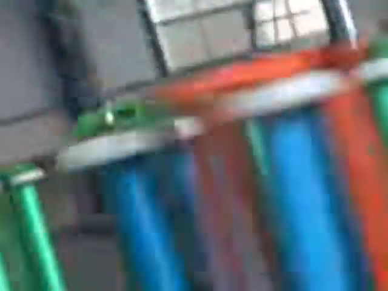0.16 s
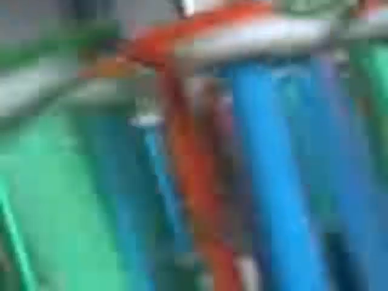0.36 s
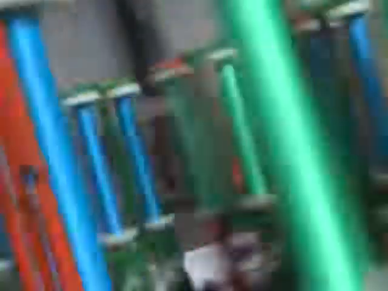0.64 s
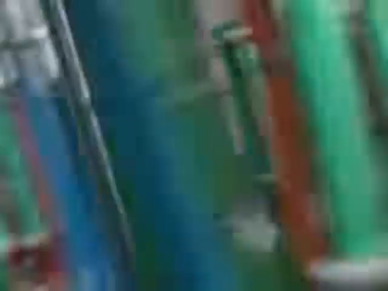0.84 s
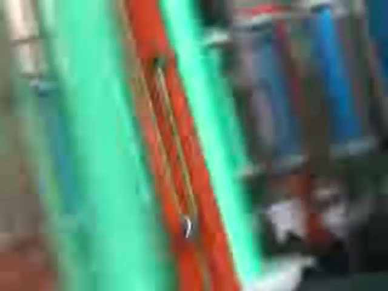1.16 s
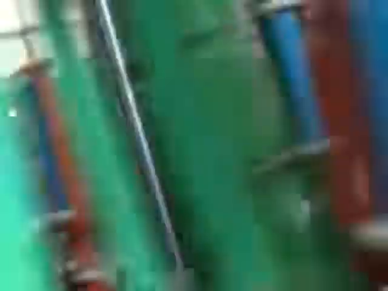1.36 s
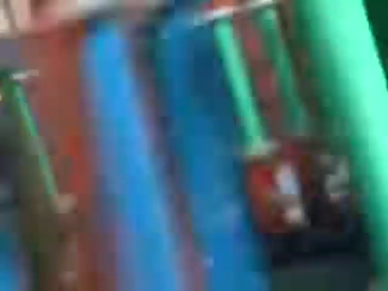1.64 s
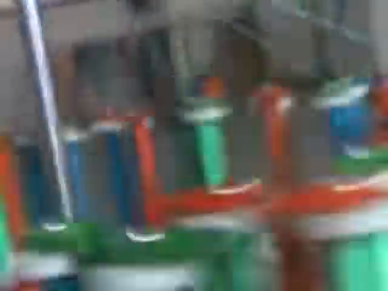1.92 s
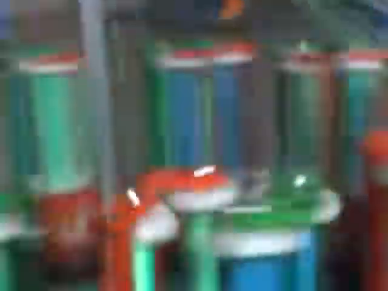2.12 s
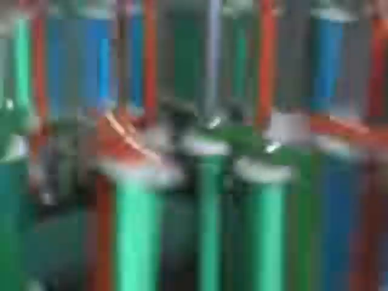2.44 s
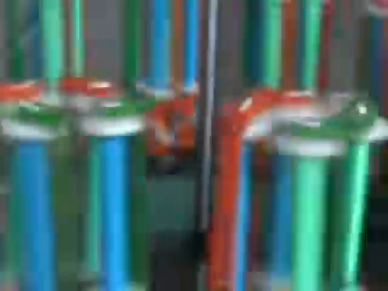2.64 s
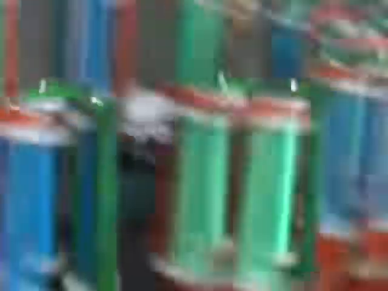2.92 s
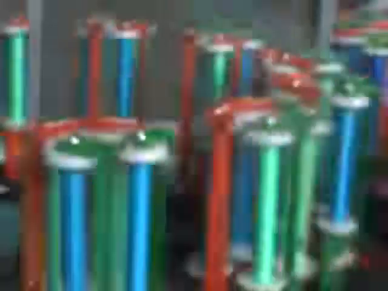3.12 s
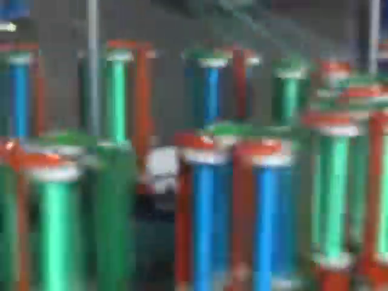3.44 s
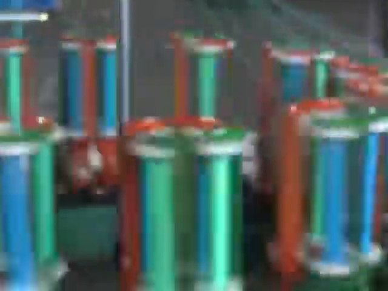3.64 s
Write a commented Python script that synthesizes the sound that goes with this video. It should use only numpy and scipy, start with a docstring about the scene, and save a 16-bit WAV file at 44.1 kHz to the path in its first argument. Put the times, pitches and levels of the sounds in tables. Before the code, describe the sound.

Continuous loud clatter of many bobbin carriers, steel gears ringing and bed plate droning, throbbing seven or eight times a second; hall echo, faint low rumble and wavering high whine behind, captured close in stereo.

```python
"""A braiding machine runs steadily, close to a hand-held camera in a workshop hall.
Bobbin carriers clank from gear to gear and thud at the track crossings: noise bursts, ringing or pitched.
Random clicks excite resonances of the steel gears and bed plate; latches and springs tick above them.
Most layers swell about 7.6 times a second. Behind lie a noisy hall roar, its echo, a low rumble
and the wavering high whine of the motor drive."""
import sys
import numpy as np
from scipy import signal
from scipy.fft import rfft, irfft
from scipy.io import wavfile
from scipy.ndimage import uniform_filter1d

SR = 44100
rng = np.random.default_rng(int(sys.argv[2]) if len(sys.argv) > 2 else 0)


def bounce(signal):
    """Save signal as a 16-bit WAV file at the path given by the first command-line argument."""
    frames = np.transpose(np.atleast_2d(signal))
    limited = np.clip(frames, -1, 1)
    pcm = np.round(limited * 32767).astype(np.int16)
    wavfile.write(sys.argv[1], SR, pcm)


def natural_amplitude(level_db):
    """Convert a level in decibels to a linear amplitude factor, elementwise."""
    exponent = np.asarray(level_db, float) / 20
    return 10 ** exponent


N = 166698  # length [samples]

# Relative levels as the camera moves:
# (time [s], left minus right [dB], low ring [dB], upper rings [dB], plate [dB], roar [dB])
MOVE = [(0, -1.5, 2.5, 3.5, 2.5, 1.5), (.55, 0.5, -4, 2, -1, 2), (1, -0.5, -4.5, 3, -0.5, 3),
        (1.35, -0.3, -1.5, 4.5, -0.5, 3), (1.5, -0.5, -8, 3.5, 1, 2.5), (2, 0, 0.5, 1.5, -1, 2),
        (2.5, -0.3, -1, 4, -1, 2), (3, 1, -1.5, 4.5, -2, 1.5), (3.4, 0.7, 0, 3, -3.5, 3),
        (3.78, 0.5, -1.5, 4, -1.5, 1.5)]
CLANK_PHASE, THUD_PHASE = 0.22, 0.76  # where in the machine cycle each swell peaks [cycles]
BUNCH_DB = 3  # rms bunching of the rattle and chatter


def evened(x):
    """Normalization: scales a signal to unit rms."""
    return x / np.sqrt(np.mean(x ** 2) + 1e-20)


def read(points, hz):
    """Spectral interpolation: joins levels by lines over log frequency."""
    f, value = np.transpose(points)
    return np.interp(np.log(hz + 1), np.log(f + 1), value)


def curve(table, column, t):
    """Linear interpolation: reads one column of a time table."""
    return np.interp(t, np.array(table)[:, 0], np.array(table)[:, column])


def drift(size):
    """Low-pass noise: unit-rms chance that changes about every size samples."""
    once = uniform_filter1d(rng.standard_normal(N), size=size)
    return evened(uniform_filter1d(once, size=size))


def swing(t, phase):
    """Periodic modulation: the machine cycle as a cosine peaking at the given phase."""
    cycle_hz = 7.57
    return np.cos(2 * np.pi * (cycle_hz * t - phase))


def resonate(x, hz, width):
    """Damped resonance: a one-pole filter of peak gain 1, shifted to a fixed or moving pitch."""
    turn = np.exp(2j * np.pi * np.cumsum(hz * np.ones(len(x))) / SR)
    r = np.exp(-np.pi * width / SR)
    return 2 * (turn * signal.lfilter([1 - r], [1, -r], x / turn)).real


def ring_modes(x, modes, tune=1):
    """Modal superposition: sums resonances, with a lower gain for a wider mode."""
    return sum(natural_amplitude(db) * resonate(x, hz * tune, width) * np.sqrt(60 / width)
               for hz, width, db in modes)


def burst(length_s, noise, rise=1):
    """Impact envelope: power-law rise, peak at rise * length_s, then exponential decay."""
    u = np.arange(len(noise)) / SR / length_s
    return noise * (u / rise) ** rise * np.exp(rise - u)


def rattle(spread_db):
    """Random impulse train: sparse clicks of uneven size and sign from all the carriers."""
    rate_per_s = 1500
    size = natural_amplitude(spread_db * np.minimum(rng.exponential(1, N), 5)) * rng.choice([-1., 1.], N)
    return evened(size * (rng.random(N) < rate_per_s / SR))


def add(mix, s, sound):
    """Linear superposition: mixes a sound in at time s."""
    part = mix[max(round(s * SR), 0):][:len(sound)]
    part += sound[:len(part)]


def tone(t, hz, width):
    """Phase diffusion: a random walk in phase broadens a sine while its level wavers."""
    waver_db = 2
    wander = np.cumsum(rng.standard_normal(N)) * np.sqrt(2 * np.pi * width / SR / 2)
    waver = drift(size=2000)
    return evened(np.sin(2 * np.pi * hz * t + wander) * natural_amplitude(waver_db * waver))


def rumble(t):
    """Low-band noise: a lumpy rumble that pulses with the machine cycle and fades over time."""
    level_db, wide_db = -58, -27
    low_hz, high_hz = 45, 101
    lump_db, swing_db, phase, fade_db_per_s = 5, 3, 1, -3
    shared, side = rng.standard_normal((2, N))
    shape_db = lump_db * drift(size=900) + swing_db * swing(t, phase) + fade_db_per_s * t
    side = natural_amplitude(wide_db) * side
    ports = np.array([shared + side, shared - side])  # nearly the same in both channels
    band = signal.butter(1, [low_hz, high_hz], "bandpass", fs=SR)
    return natural_amplitude(level_db) * evened(signal.lfilter(*band, ports * natural_amplitude(shape_db)))


def hall(x, t):
    """Reverberation: three sparse decaying echo trains, crossfaded in rotation for a smoother tail."""
    t60_s, turn_rate_hz = 0.93, 1.702
    count, spacing, delay = 900, 20, 300  # echoes per train, then samples
    taps = np.zeros((3, count * spacing + delay))
    at = delay + np.arange(count) * spacing + rng.integers(0, spacing, (3, count))
    echoes = rng.choice([-1., 1.], at.shape) * natural_amplitude(-60 * at / SR / t60_s)
    np.put_along_axis(taps, at, echoes, 1)
    # The three feeds keep a constant total power
    feed = np.sqrt(2 / 3) * np.cos(np.pi * (turn_rate_hz * t + np.arange(3)[:, None] / 3))
    return signal.fftconvolve(x * feed, taps / np.linalg.norm(taps[0]), axes=1)[:, :N].sum(0)


def roar():
    """Diffuse sound: the hall's blurred clatter as patchy noise that throbs with the cycle."""
    # Long-term spectrum: (frequency [Hz], relative density [dB per Hz])
    spectrum = [(25, -21), (110, -14.5), (230, -18.5), (300, -17), (400, -8.5), (557, -4), (1300, -5),
                (1550, -13), (2230, -7), (3030, -8), (4570, -12.5), (6500, -11.5), (8000, -10.5),
                (9370, -14), (11100, -15.5)]
    level_db, patch_db, flicker_db = -20.5, 2.13, 3
    flicker_low = 0.55  # share of the flicker left in the low roar
    turn_hz, low_swing_db, high_swing_db = 1610, 3, -0.9
    hop = 128
    frames, hz = N // hop + 5, np.fft.rfftfreq(512, 1 / SR)
    a, b, patches, wide = rng.standard_normal((frames, 257, 4)).T  # frequency by time
    patches = evened(uniform_filter1d(uniform_filter1d(patches, size=5, axis=0), size=14, axis=1))
    wide = evened(uniform_filter1d(uniform_filter1d(wide, size=50, axis=0), size=2, axis=1))
    t = np.arange(frames) * hop / SR
    low = (1 / (1 + (hz / turn_hz) ** 4))[:, None]
    high = 1 - low
    throb = low * low_swing_db * swing(t, THUD_PHASE) + high * high_swing_db * swing(t, CLANK_PHASE)
    flicker = flicker_db * (high + flicker_low * low) * wide
    z = (a + 1j * b) * natural_amplitude(patch_db * patches + flicker + throb + curve(MOVE, column=5, t=t))
    x = signal.istft(z, nperseg=512, noverlap=384)[1][:N]
    colour = natural_amplitude(read(spectrum, np.fft.rfftfreq(N, 1 / SR)))
    return natural_amplitude(level_db) * evened(irfft(rfft(x) * colour, N))


def whine(t):
    """Tonal drive noise: wavering switching tones and their sidebands in three groups."""
    # Motor drive tones by group (low, middle, high), a broad skirt last in each: frequency [Hz]
    tones_hz = [
        [9767, 9802, 9810],
        [9930, 9962, 9998, 10035, 9990],
        [10190, 10200],
    ]
    # The same tones: (wavering width [Hz], rms level before the reach [dB])
    tones_level = [
        [(14, -44), (10, -39), (70, -42)],
        [(20, -46), (8, -36.5), (10, -36), (10, -40), (100, -38)],
        [(12, -43), (70, -46)],
    ]
    # Gain of each group on its way to the moving camera: (time [s], low [dB], middle [dB], high [dB])
    reach = [(0, 11.5, 0.5, 9), (.3, 3, 5.5, -6), (.6, 4, 4.5, 8), (1.1, 2.5, 2.5, -1), (1.5, 7.5, 3.5, 6),
             (1.9, 4.5, 3, -2), (2.2, 4, -0.5, 5), (2.55, -4, 6, 5), (2.9, 4, -2, 2), (3.3, -2, 0.5, 5),
             (3.78, 8, 1.5, -3)]
    out = np.zeros(N)
    for k, (group_hz, group) in enumerate(zip(tones_hz, tones_level)):
        tones = sum(natural_amplitude(db) * tone(t, hz, width) for hz, (width, db) in zip(group_hz, group))
        out += tones * natural_amplitude(curve(reach, column=k + 1, t=t))
    return out


def ticks(t):
    """Short impacts: band-limited bursts and glints over the dry chatter of the carriers."""
    # Latches and springs: (time [s], level before tick_db [dB], centre frequency [Hz])
    latch_ticks = [(.265, -28.5, 7600), (.56, -28.5, 7300), (0.786, -30, 7700), (0.916, -29, 6600),
                   (1.111, -33, 6500), (1.195, -32, 6600), (1.433, -33, 8500), (1.658, -29, 7300),
                   (2.307, -29.5, 7000), (2.413, -34, 6700), (3.104, -29, 7000), (3.3, -31, 6400),
                   (3.534, -27.5, 6400), (3.624, -33, 6950)]
    # Glints of a small steel latch: (time [s], level [dB])
    glints = [(.499, -27.5), (.835, -31), (1.199, -28), (1.263, -31), (2.523, -33), (2.659, -24),
              (2.786, -41), (3.185, -28), (3.305, -28), (3.448, -30)]
    chatter_db, spread_db, swing_db = -29, 5, 6.5
    chatter_hz, chatter_width_hz = 6060, 5400
    tick_db, tick_s, tick_width_hz = 7.5, 0.0054, 1800
    glint_hz, glint_width_hz, glint_s = 5140, 130, 0.014
    drive = rattle(spread_db) * natural_amplitude(swing_db * swing(t, CLANK_PHASE) + BUNCH_DB * drift(size=500))
    chatter = resonate(drive, chatter_hz, chatter_width_hz)
    out = natural_amplitude(chatter_db) * evened(resonate(chatter, chatter_hz, chatter_width_hz))
    for (s, db, hz), noise in zip(latch_ticks, rng.standard_normal((len(latch_ticks), 2500))):
        band = evened(resonate(resonate(noise, hz, tick_width_hz), hz, tick_width_hz))
        add(out, s, natural_amplitude(db + tick_db) * burst(tick_s, band))
    for (s, db), noise in zip(glints, rng.standard_normal((len(glints), 2500))):
        band = evened(resonate(noise, glint_hz, glint_width_hz))
        add(out, s, natural_amplitude(db) * burst(glint_s, band))
    return out


def plate(t):
    """Modal excitation: the bed plate drones under the rattle, with a thud at each crossing."""
    # Bed plate modes: (frequency [Hz], width [Hz], level before width weighting [dB])
    plate_modes = [(354, 8.7, -4.5), (431.7, 12.6, 1), (507, 8.6, -8), (554, 38, -0.5), (657, 89, 5.5),
                   (728.6, 40, 2), (851, 56, 3.5), (995, 35, 6), (1210, 186, 7.5), (1275, 140, 1.5)]
    # Carrier feet at the crossings: (time [s], level before thud_db [dB], body pitch [Hz])
    thuds = [(0, -20, 1300), (0.103, -15.5, 760), (0.214, -22, 543), (0.347, -18, 826), (0.372, -19, 596),
             (0.478, -19.5, 580), (0.606, -19, 644), (0.66, -18, 1280), (0.709, -17.5, 1210),
             (0.754, -21.5, 1026), (0.816, -27, 726), (0.874, -25, 740), (0.903, -18.5, 565),
             (0.997, -24, 1210), (1.046, -15, 1210), (1.146, -23, 504), (1.25, -35, 650),
             (1.302, -35, 1230), (1.353, -21, 685), (1.42, -19, 668), (1.484, -19, 1240), (1.535, -31, 995),
             (1.687, -29, 630), (1.792, -24, 690), (1.94, -17, 637), (2.075, -15.5, 707), (2.215, -16, 810),
             (2.321, -35, 940), (2.452, -19, 820), (2.545, -19, 1252), (2.588, -19, 1046),
             (2.742, -28, 760), (2.858, -19, 850), (2.979, -26, 870), (3.116, -21, 1086), (3.191, -19, 996),
             (3.246, -15.5, 995), (3.382, -17, 880), (3.517, -19, 1265), (3.599, -17.5, 1246),
             (3.644, -16, 775), (3.692, -25, 974)]
    drone_db, spread_db, swing_db = -25.5, 1.5, 1.5
    thud_db, thud_s, thud_rise = -1, 0.013, 0.67  # rise under 1: a firmer attack
    width_share, noise_share = 0.77, 0.72  # bandwidth over pitch; scraping beside the ring
    drive = rattle(spread_db) * natural_amplitude(swing_db * swing(t, THUD_PHASE) + curve(MOVE, column=4, t=t))
    out = natural_amplitude(drone_db) * evened(ring_modes(drive, plate_modes))
    for (s, db, hz), noise in zip(thuds, rng.standard_normal((len(thuds), 4000))):
        width = width_share * hz
        scrape = evened(resonate(resonate(noise, hz, width), hz, width))
        ring = np.sqrt(2) * np.sin(2 * np.pi * hz * np.arange(len(noise)) / SR + noise[0])
        blow = noise_share * scrape + (1 - noise_share) * ring
        add(out, s, natural_amplitude(db + thud_db) * burst(thud_s, blow, thud_rise))
    return out


def gears(t):
    """Modal excitation: bunched rattle and clanks ring steel gears of slightly differing pitch."""
    # Modes by ring (low, middle, high, rattle only):
    # (frequency [Hz], width [Hz], level before width weighting [dB])
    gear_modes = [
        [(2673, 37, -6.5), (2729, 29, 2.5)],
        [(3812, 56, -2.5)],
        [(4210, 60, -6.5)],
        [(1955, 43, -6), (2087, 6.7, -16.5), (2450, 140, -11.5), (5187, 300, -5.5)],
    ]
    # Carrier hand-overs that strike the gears:
    # (time [s], peak level before clank_db [dB], ring struck [0 low, 1 middle, 2 high])
    clanks = [(0.009, -15.5, 1), (0.017, -39, 0), (0.151, -18, 1), (0.182, -25.5, 2), (0.182, -21, 0),
              (0.274, -17, 1), (0.282, -19, 0), (0.404, -15.5, 1), (0.413, -16, 0), (0.546, -15.5, 1),
              (0.576, -21, 2), (0.628, -24, 2), (0.675, -19, 1), (0.694, -17.5, 2), (0.946, -16.5, 1),
              (0.948, -33, 2), (1.333, -32, 2), (1.449, -16, 0), (1.47, -25, 2), (1.499, -16, 1),
              (1.595, -17.5, 0), (1.611, -16.5, 1), (1.749, -14.5, 1), (1.853, -18, 0), (1.864, -15, 1),
              (1.905, -21, 0), (1.99, -13, 1), (2.021, -22, 2), (2.127, -15, 1), (2.157, -25, 0),
              (2.263, -16, 0), (2.281, -14.5, 1), (2.382, -25, 2), (2.384, -19, 1), (2.4, -17, 0),
              (2.52, -18.5, 1), (2.524, -16, 0), (2.53, -26, 2), (2.661, -15, 1), (2.79, -17, 1),
              (2.794, -21, 0), (2.831, -18, 1), (2.921, -18, 0), (2.925, -17.5, 1), (3.039, -30, 0),
              (3.055, -27, 1), (3.132, -18, 0), (3.191, -17.5, 0), (3.205, -18, 1), (3.247, -18, 0),
              (3.315, -20, 1), (3.404, -20.5, 0), (3.476, -25, 0), (3.534, -24, 0), (3.581, -16.5, 0),
              (3.583, -25, 1)]
    ring_db, spread_db, swing_db = -23.5, 3.5, 1
    clank_db, clank_s, clank_rise = 3.5, 0.0075, 0.63
    scatter = 0.0067  # rms pitch spread between like gears [share]
    move_columns = [2, 3, 3, 3]
    out = np.zeros(N)
    for column, modes in zip(move_columns, gear_modes):
        level_db = swing_db * swing(t, CLANK_PHASE) + curve(MOVE, column=column, t=t)
        drive = rattle(spread_db) * natural_amplitude(level_db + BUNCH_DB * drift(size=450))
        out += ring_modes(drive, modes, 1 + scatter * drift(size=1200))
    out = natural_amplitude(ring_db) * evened(out)
    for (s, db, k), noise in zip(clanks, rng.standard_normal((len(clanks), 4001))):
        strike = burst(clank_s, noise[1:], clank_rise)
        struck = ring_modes(strike, gear_modes[round(k)], 1 + scatter * noise[0])
        add(out, s, natural_amplitude(db + clank_db) * struck / abs(struck).max())
    return out


def scene():
    """Direct and reverberant fields: sums the machine and hall, panned as the camera turns."""
    echo_db, wide_db = -5, -11.5
    t = np.arange(N) / SR
    near = gears(t) + plate(t) + ticks(t)
    whole = near + roar() + whine(t)
    pan = curve(MOVE, column=1, t=t)
    wide = np.array([hall(whole, t), hall(whole, t)]) * natural_amplitude(wide_db)  # independent left and right
    return (whole + natural_amplitude(echo_db) * hall(near, t)) * natural_amplitude([pan / 2, -pan / 2]) + wide


def top_cut(x):
    """Nothing passes above the cut-off."""
    return signal.sosfilt(signal.butter(12, 11660, fs=SR, output="sos"), x)


def record(dry):
    """Filtering and saturation: port balance, low cut, low rumble, soft overload, band limit."""
    # Balance before its mean is removed: (frequency [Hz], left minus right [dB])
    balance = [(60, 10), (140, 7), (340, 5.5), (810, 4.5), (1940, 3.5), (4640, 6), (11100, 4)]
    low_cut_hz, knee, edge_hz = 160, 0.83, 11035  # knee: ceiling of the soft overload
    hz = np.fft.rfftfreq(N, 1 / SR)
    tilt = read(balance, hz) - np.mean([db for _, db in balance])
    low_cut = 1 + (low_cut_hz / (hz + 1)) ** 4
    x = irfft(rfft(dry) * natural_amplitude([tilt / 2, -tilt / 2]) / low_cut, N)
    x = x + rumble(np.arange(N) / SR)
    overloaded = knee * np.tanh(x / knee)
    finished = irfft(rfft(overloaded) * (hz < edge_hz), N)
    return top_cut(finished)


dry = scene()
out = record(dry)
bounce(out)
```